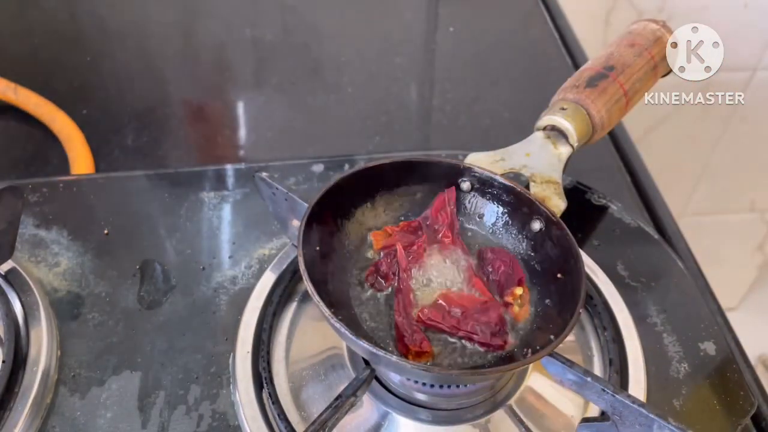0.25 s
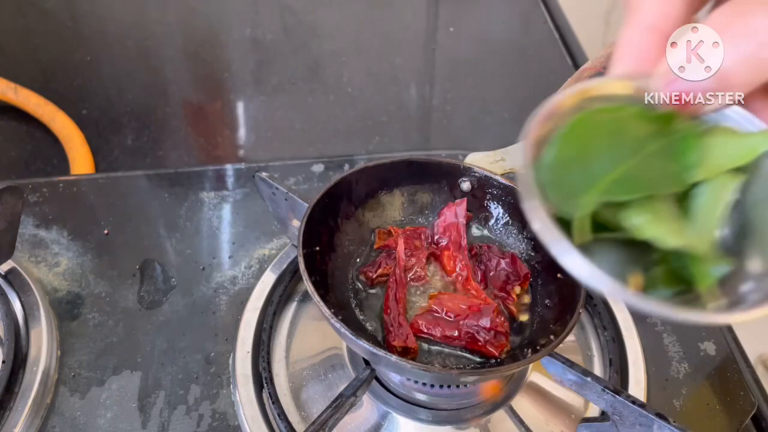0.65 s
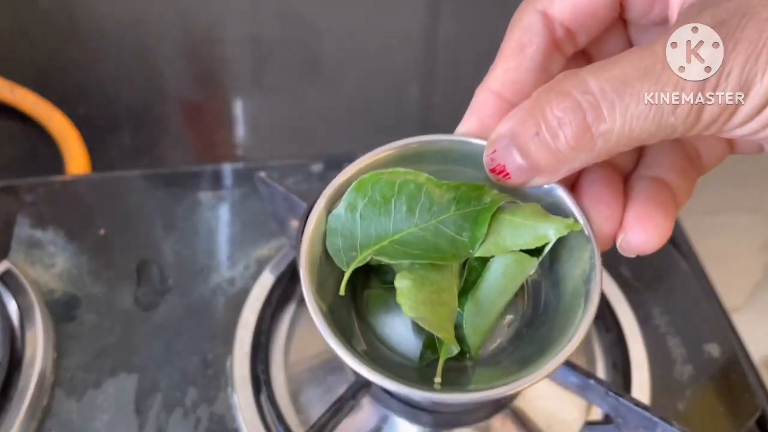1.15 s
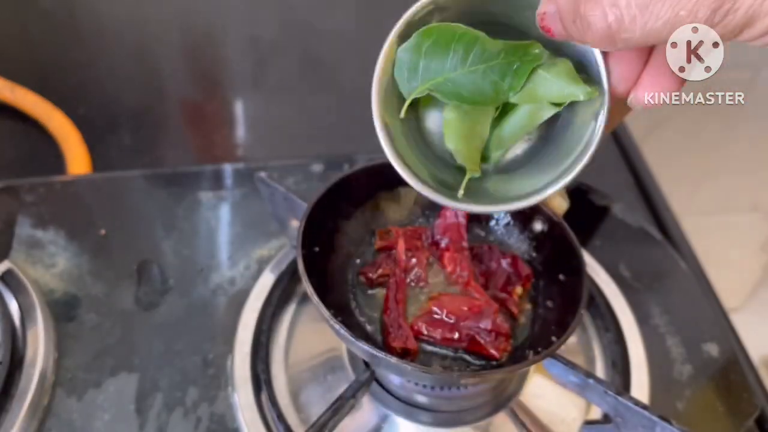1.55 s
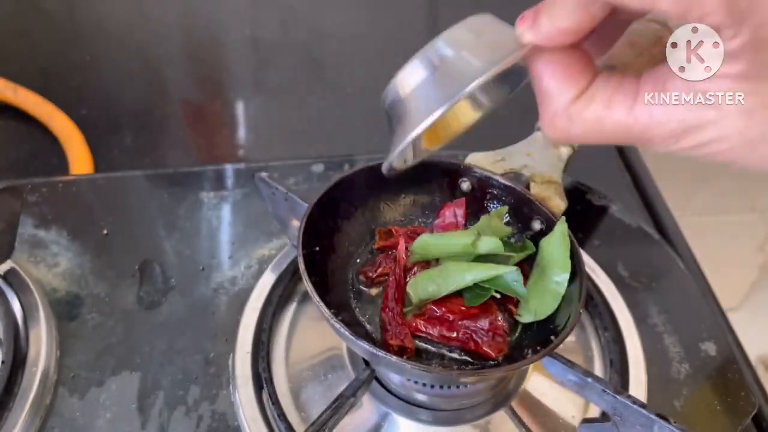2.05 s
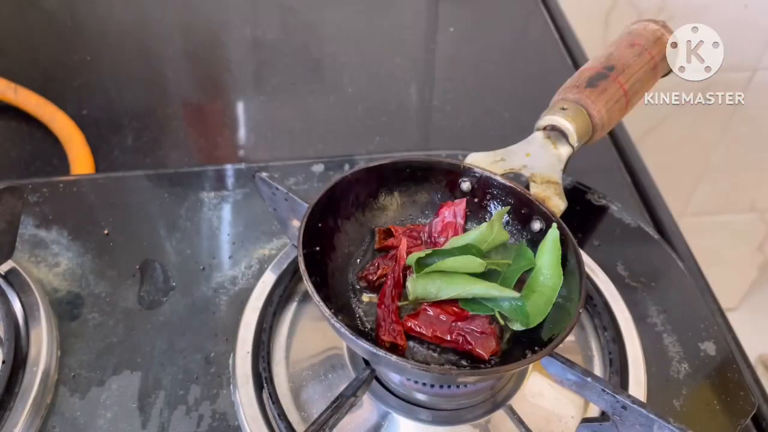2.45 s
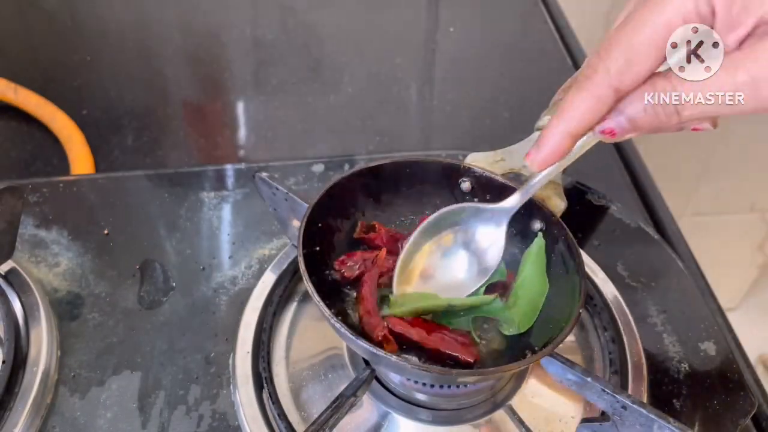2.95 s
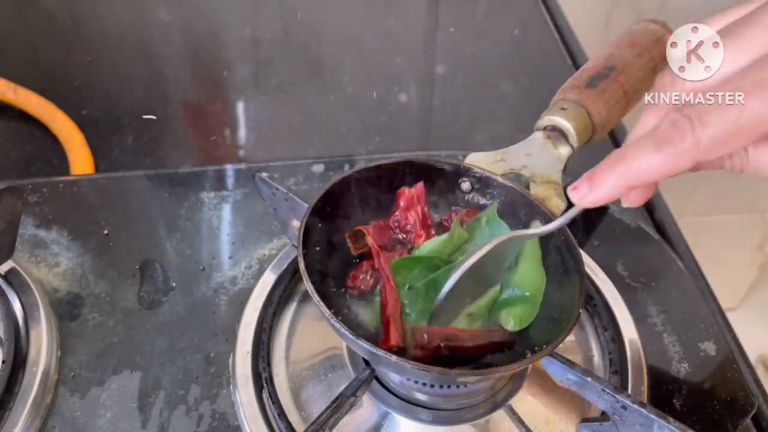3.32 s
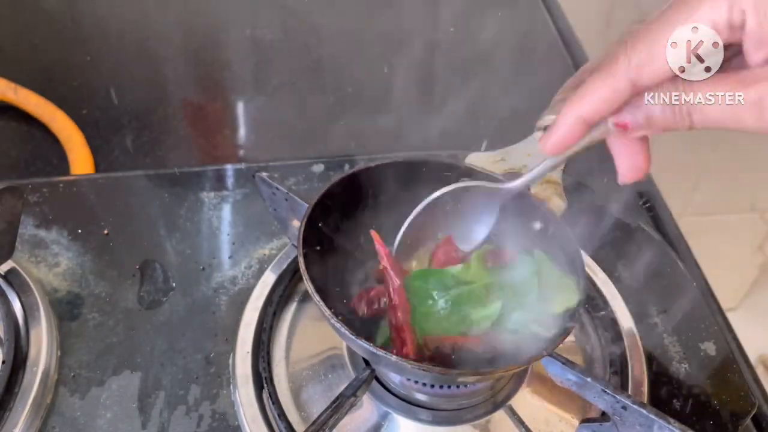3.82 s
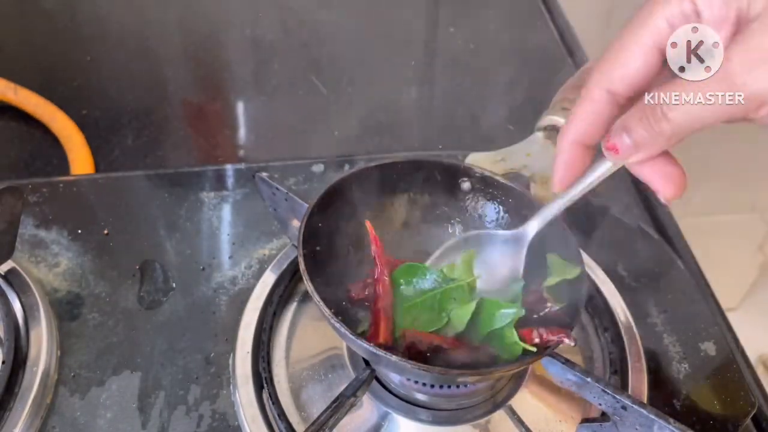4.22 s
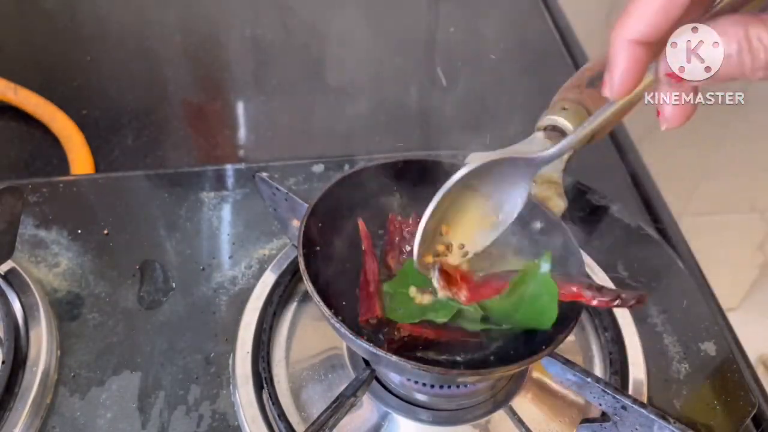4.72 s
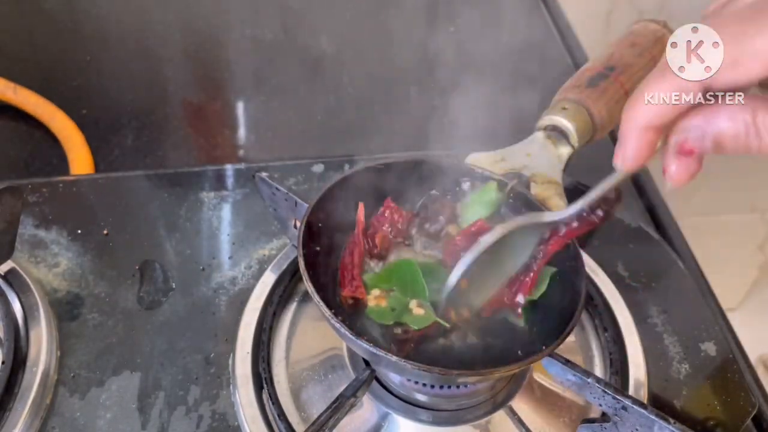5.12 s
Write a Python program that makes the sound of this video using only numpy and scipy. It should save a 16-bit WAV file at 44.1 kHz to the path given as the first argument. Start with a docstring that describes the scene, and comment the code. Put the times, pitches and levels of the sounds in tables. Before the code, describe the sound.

Hot oil crackles quietly with scattered sharp pops, then bursts into a loud sputtering sizzle when wet leaves are pressed in and stirred.

```python
"""Spices fry in a small iron pan over a gas flame: hiss and random clicks, coloured by the pan, that roar up
when wet leaves are pressed into the oil. Spits are short decaying rings with a bright snap and a low thud.
Under them the kitchen gives a low hum of uneven level and bands of noise; faint sine tones swell, and air puffs once.
A phone with two ports listens close by, a wall behind the stove; three takes are joined by two cuts, each a short
fade-out, a silent gap and a slower fade-in."""
import sys
import numpy as np
from scipy import signal
from scipy.fft import rfft, irfft, next_fast_len
from scipy.io import wavfile
from scipy.ndimage import uniform_filter1d

SR = 44100
rng = np.random.default_rng(int(sys.argv[2]) if len(sys.argv) > 2 else 0)


def waveform_to_disk(signal):
    """Save audio, clipped to [-1, 1], as 16-bit WAV at the path in sys.argv[1]."""
    frames = np.transpose(np.atleast_2d(signal))
    scaled = np.clip(frames, -1, 1) * 32767
    samples = np.round(scaled).astype(np.int16)
    wavfile.write(sys.argv[1], SR, samples)


N = 236808
SIZE = next_fast_len(N + SR // 2)  # room for the wash to ring out
HZ = np.maximum(np.arange(SIZE // 2 + 1) * SR / SIZE, 1)


def undb(db):
    """Decibels to amplitude."""
    return 10 ** (np.asarray(db) / 20)


def unit(x):
    """The same sound at an RMS level of 1."""
    return x / np.sqrt(np.mean(x ** 2))


def curves(rows):
    """Columns of (seconds, ..) rows as per-sample lines."""
    seconds, *columns = np.transpose(rows)
    return [np.interp(np.arange(N) / SR, seconds, column) for column in columns]


def over_hz(table):
    """A (Hz, value) table on the frequency axis, joined along log frequency."""
    hz, value = np.transpose(table)
    return np.interp(np.log(HZ), np.log(np.maximum(hz, 1)), value)


def shape(x, response):
    """Filter a sound by a frequency response."""
    return irfft(rfft(x, SIZE) * response, SIZE)[..., :N]


def walk(rate):
    """A random wander: normal draws, `rate` a second, held and smoothed twice; spread about 0.6."""
    hold = int(SR / rate)
    steps = np.repeat(rng.standard_normal(N // hold + 1), hold)
    return 0.82 * uniform_filter1d(uniform_filter1d(steps, hold), hold)[:N]


# Phase between the phone's two ports. Each row: frequency in Hz, lead of the left in radians.
PORT_LEAD = [(0, 0), (1120, -0.1), (1380, 0.9), (1980, 0.3), (3360, 0.9), (4480, 0.5), (4820, 1.3),
             (6800, -1.1), (7670, -3.0), (8870, -3.3), (10400, -6.0), (12900, -6.4), (13900, -9.4),
             (16300, -9.4)]
# Balance of the two ports. Each row: frequency in Hz, left minus right in dB.
PORT_BALANCE = [(60, 1.5), (110, 2.0), (200, 1.0), (380, 0.5), (700, 2.5), (1290, 1.5), (2380, 1.5),
                (4400, 3.0), (8120, 0.5), (15000, 0.0)]


def ports(same, other, likeness):
    """Left and right share one sound, up to the ports' phase and balance, plus a part that differs."""
    alike = over_hz(likeness)
    half = np.exp(.5j * over_hz(PORT_LEAD)) * undb(over_hz(PORT_BALANCE) / 2)
    common = rfft(same, SIZE) * np.sqrt((1 + alike) / 2)
    differing = rfft(other, SIZE) * np.sqrt((1 - alike) / 2)
    return irfft(np.array([(common + differing) * half, (common - differing) / half]), SIZE)[:, :N]


def crackles(per_s, spread_db):
    """Bursting bubbles: clicks at random, a few much larger than the rest."""
    burst, size, sign = rng.random((3, N))
    sizes = undb(-spread_db * np.log(np.maximum(size, .04)))
    return unit((burst < per_s / SR) * sizes * np.sign(sign - .5))


def scattered(x, ms):
    """The same sound after dense random bounces in the pan, dying by 1/e in `ms`."""
    t = np.arange(SR // 50) / SR
    bounces = rng.standard_normal(len(t)) * np.exp(-t * 1000 / ms)
    return signal.fftconvolve(x, bounces / np.linalg.norm(bounces))[:N]


# Patches of the sizzle. Centres of the overlapping bands in Hz.
PATCH_HZ = (1200, 2200, 3200, 4600, 6500)
# Body of the sizzle against its treble. Each row: time in seconds, gain of the low bands in dB.
BODY = [(0, -1), (2.9, 1), (3.1, -4), (3.17, -1.5), (3.25, 4), (3.41, 0), (3.47, 1), (3.53, -1),
        (3.65, 3.5), (3.85, 4), (3.95, 3.5), (4.3, -0.5), (4.45, -4.5), (4.56, 3.5), (4.66, -7),
        (4.8, -1.5), (4.95, -1), (5.1, 2.5), (5.2, 2.5), (5.37, 0)]
BODY_TOP_HZ = 3500  # bands centred below this follow the body
PATCH_DB, PATCH_PER_S = 2.5, 14  # dB for each unit of the wander, and its new draws a second


def patchy(x):
    """Bands of a sound, each surging by itself; the low ones also follow the body."""
    out, body_db = 0, curves(BODY)[0]
    for hz, row in zip(PATCH_HZ, np.eye(len(PATCH_HZ))):
        db = PATCH_DB * walk(PATCH_PER_S) + body_db * (hz < BODY_TOP_HZ)
        band = shape(x, over_hz(list(zip(PATCH_HZ, row))))
        out = out + band * undb(db)
    return out


# The oil in the pan. Each row: time in seconds, sizzle level in dB, level of the fine high spray in dB.
FRY = [(0, -47, -49), (.3, -48, -46), (.36, -44.5, -42), (.4, -40.5, -40), (.45, -44.5, -38),
       (.5, -45, -46.5), (.7, -53, -60), (1.3, -54, -66), (2.05, -55.5, -57.5), (2.3, -51.5, -48.5),
       (2.56, -44, -54), (2.62, -48, -52), (2.72, -60, -55), (2.88, -52, -59), (2.95, -36.5, -36.5),
       (3.05, -30.5, -32), (3.14, -22, -23), (3.17, -28, -26), (3.21, -28.5, -27.5), (3.3, -22.5, -23.5),
       (3.36, -24.5, -25), (3.4, -20, -25.5), (3.435, -19.5, -22), (3.445, -24.5, -26), (3.48, -23, -20),
       (3.53, -22, -25), (3.62, -30, -32.5), (3.7, -29, -29), (3.8, -27, -25), (3.87, -31, -31.5),
       (3.93, -30.5, -31), (3.97, -32.5, -31), (4.1, -32, -32), (4.2, -31.5, -34.5), (4.3, -32, -35.5),
       (4.38, -31, -32), (4.43, -28.5, -32), (4.48, -31.5, -33.5), (4.55, -33, -31.5), (4.66, -28, -34),
       (4.78, -28.5, -33.5), (4.9, -32, -34), (4.96, -28.5, -30.5), (5.0, -33.5, -29.5), (5.06, -34, -29),
       (5.14, -33, -30), (5.22, -34.5, -29.5), (5.28, -32.5, -35), (5.33, -33, -33.5), (5.37, -32, -36)]
# Colour of the sizzle. Each row: frequency in Hz, relative level in dB.
SIZZLE_COLOUR = [(150, -36), (400, -18.5), (1000, -6.5), (1330, -13), (1560, 1), (2100, -2.5), (2300, 2),
                 (2700, -4.5), (3100, 3), (3800, -0.5), (4100, -3), (7000, 2), (9000, -1), (12000, -46.5)]
# Colour of the fine spray. Each row: frequency in Hz, relative level in dB.
SPRAY_COLOUR = [(5000, -30), (7500, -2), (9000, 0), (11000, -3), (13200, -9), (15500, -4), (16000, -6)]
# Lone crackles carry more when the oil is quiet. Each row: sizzle level in dB, share of power from 0 to 1.
CRACKLE_SHARE = [(-51, 0.45), (-38.5, 0.44), (-22.5, .2)]
FLURRY_MS = 3.9  # 1/e fade of a flurry's power
# fizz after a spit: sizzle against the spit, spray against its bright edge, 1/e fade of the power
AFTERFIZZ_DB, AFTERFIZZ_SPRAY_DB, AFTERFIZZ_MS = -26, -10.5, 4.8


def fading(x, ms):
    """Let each impulse die away by 1/e in `ms`."""
    return signal.lfilter([1], [1, -np.exp(-1000 / (ms * SR))], x)


def frying():
    """Dense hiss of tiny bubbles and lone crackles, coloured by the pan; a second row for what differs at the ports."""
    db, spray_db = curves(FRY)
    share = np.interp(db, *np.transpose(CRACKLE_SHARE))
    # each spit in the table leaves the oil fizzing
    after = np.zeros((2, N))
    for s, spit_db, _, edge_db in SPITS:
        after[:, int(s * SR)] = undb([spit_db + AFTERFIZZ_DB, spit_db + edge_db + AFTERFIZZ_SPRAY_DB])
    after = fading(after ** 2, AFTERFIZZ_MS)
    burst = crackles(1200, spread_db=6.0)
    # sparse random bursts each swell hiss and crackles alike: a brief flurry
    flurry = fading(crackles(170, spread_db=3.5) ** 2, FLURRY_MS)
    surge = unit(np.sqrt(1 + 0.23 * flurry / np.mean(flurry)) * undb(0.63 * walk(40)))
    burst = surge * np.array([burst, scattered(burst, ms=0.64)])
    out = 0
    for colour, gain_db, fizz in zip((SIZZLE_COLOUR, SPRAY_COLOUR), (db, spray_db), after):
        hiss = surge * rng.standard_normal((2, N))
        drive = np.sqrt(1 - share) * hiss + np.sqrt(share) * burst
        coloured = unit(patchy(shape(drive, undb(over_hz(colour)))))
        out = out + np.sqrt(undb(gain_db) ** 2 + fizz) * coloured
    return out


# Low hum. Each row: time in seconds, level in dB.
HUM = [(0, -31), (.07, -31), (.19, -29.5), (.24, -44), (.48, -37.5), (.66, -29), (.7, -32.5), (.76, -46.5),
       (.9, -22.5), (.94, -30), (1.0, -40.5), (1.1, -33), (1.17, -36), (1.25, -25.5), (1.3, -47),
       (1.49, -36), (1.54, -33.5), (1.62, -34), (1.75, -28.5), (1.82, -42), (1.93, -31.5), (1.97, -39),
       (2.06, -25), (2.17, -29.5), (2.33, -38.5), (2.5, -34), (2.59, -59), (2.71, -41), (2.75, -58),
       (2.83, -42), (2.89, -46), (2.97, -38), (3.05, -53), (3.3, -38.5), (3.36, -62), (3.6, -49),
       (3.75, -50), (4.28, -66), (4.71, -59), (5.08, -50), (5.37, -55)]
# Kitchen around the stove. Each row: time in seconds, rumble level in dB, mid-band hush level in dB.
KITCHEN = [(0, -34, -36), (.45, -33, -36.5), (.75, -31.5, -38), (.9, -35.5, -40), (1.04, -33.5, -38),
           (1.4, -34, -38.5), (1.7, -35, -38.5), (2.0, -34.5, -36.5), (2.33, -35, -38.5),
           (2.56, -40, -40.5), (2.96, -37, -41), (3.4, -39, -44), (3.6, -48, -51.5), (4.2, -59.5, -46),
           (4.5, -50, -57), (4.7, -47, -49), (5.37, -44, -51)]
# Drone. Each row: time in seconds, level in dB.
DRONE = [(0, -42), (2.3, -43), (2.5, -48.5), (3.4, -45.5), (3.6, -55), (4.55, -59.5), (4.68, -46.5),
         (5.37, -51.5)]
# Colours of rumble, drone and hush. Each row: frequency in Hz, relative level in dB.
RUMBLE_COLOUR = [(30, -38), (50, -11), (70, -0.5), (81, 6), (95, 1.5), (115, 1), (135, -1), (170, -16),
                 (300, -13), (450, -49)]
DRONE_COLOUR = [(150, -28.5), (185, -10), (200, 2.5), (220, -13.5), (245, 0.5), (270, -28), (330, -46)]
HUSH_COLOUR = [(150, -0.5), (300, -4), (500, -2.5), (1100, -7), (2200, -14.5), (4000, -23.5), (7000, -35),
               (12000, -64)]
# The kitchen at the two ports. Each row: frequency in Hz, likeness from 0 to 1.
FAR_LIKENESS = [(60, 0.94), (180, 0.89), (330, 0.6), (450, 0.017), (2000, 0.05), (4000, 0.91)]
HUM_HZ, HUM_WAVER_HZ = 59.5, 3.3  # pitch, and its shift for each unit of the wander


def kitchen():
    """Flame and house: a low sine hum that wanders in pitch and level; wavering noise bands for rumble, drone, hush."""
    hum = np.sqrt(2) * np.sin(2 * np.pi * np.cumsum(HUM_HZ + HUM_WAVER_HZ * walk(13)) / SR)
    out = undb(curves(HUM)[0]) * np.array([hum, hum])
    rumble_db, hush_db = curves(KITCHEN)
    levels_db = rumble_db, curves(DRONE)[0], hush_db
    colours = RUMBLE_COLOUR, DRONE_COLOUR, HUSH_COLOUR
    for colour, db, waver_db in zip(colours, levels_db, (2.0, 3.5, 2.2)):
        pair = shape(rng.standard_normal((2, N)), undb(over_hz(colour)))
        out = out + undb(db + waver_db * walk(12)) * unit(pair)
    return ports(*out, FAR_LIKENESS)


# Faint tones near the pan. Each row: start in seconds, end in seconds, level in dB, pitch in Hz.
TONES = [(-.04, 0.115, -45.5, 877), (0.153, 0.262, -47, 534), (.3, 0.442, -44, 517),
         (1.198, 1.415, -50.5, 2620), (1.917, 2.055, -53, 1600), (1.93, 2.03, -50, 800),
         (2.027, 2.17, -50, 756)]
# for each unit of the wander: relative pitch shift and level change; then the ramp at either end
TONE_WAVER, TONE_FLUTTER_DB, TONE_SWELL_S = .004, 3, .03


def whistle():
    """Faint, slightly wavering sine tones that swell and fade."""
    t, out = np.arange(N) / SR, 0
    for start, end, db, hz in TONES:
        ramp = np.clip(np.minimum(t - start, end - t) / TONE_SWELL_S, 0, 1)
        swell = ramp * undb(db + TONE_FLUTTER_DB * walk(40.36))
        phase = 2 * np.pi * np.cumsum(hz * (1 + TONE_WAVER * walk(40))) / SR
        out = out + swell * np.sqrt(2) * np.sin(phase)
    return out


# small spits: rate, level over the sizzle and its scatter, pitch range, bright edge
SMALL_PER_S, SMALL_DB, SMALL_SCATTER_DB, SMALL_HZ, SMALL_EDGE_DB = 240, 5, 1.7, (2100, 7000), -13


def small_spits():
    """Rows like the table of spits, drawn at random, their level following the sizzle."""
    when, size, pitch = rng.random((int(SMALL_PER_S * N / SR), 3)).T
    sizzle_db = curves(FRY)[0][(when * N).astype(int)]
    db = sizzle_db + SMALL_DB - SMALL_SCATTER_DB * np.log(np.maximum(size, .05))
    low, high = SMALL_HZ
    pitches = low * (high / low) ** pitch
    return [(s, d, hz, SMALL_EDGE_DB) for s, d, hz in zip(when * N / SR, db, pitches)]


# Spits from the pan, before its colour.
# Each row: time in seconds, level in dB, pitch in Hz, bright edge against that level in dB.
SPITS = [(0.0166, -17.5, 2260, -18), (0.1213, -22.5, 6900, -22), (.1374, -35, 5000, -10),
         (.213, -37, 2320, -3), (0.224, -28, 5060, -0.5), (0.237, -20, 6950, -18), (0.3755, -12, 3410, -9),
         (.3545, -30, 4000, -8), (0.392, -30, 3300, -4), (0.399, -30, 3300, 0), (0.418, -27, 4250, 8),
         (0.4247, -18, 5900, -23), (0.4846, -24, 5030, -2.5), (.776, -22, 6140, -25),
         (0.7865, -21, 2280, 4), (0.8037, -19.5, 2670, -21), (.811, -19, 6940, -7),
         (1.095, -28.5, 2270, -23), (1.228, -26, 5040, -27), (1.3911, -15.5, 2330, -20),
         (1.5728, -8.5, 2800, -25), (1.766, -39, 2080, -20), (1.94, -29.5, 3220, -9),
         (2.1164, -34.5, 2260, 3), (2.1658, -39, 2230, 1), (2.1881, -33, 2470, 2), (2.203, -35, 2030, 3.5),
         (2.339, -23, 6340, -13), (2.4277, -8.5, 2780, -26), (2.512, -7.5, 3010, -15),
         (2.521, -11.5, 2560, -14), (2.5385, -17, 3140, -9), (2.554, -18, 2470, -11),
         (2.604, -30.5, 6800, 0), (2.678, -38, 6500, 2), (2.7015, -34.5, 5500, 7),
         (2.7207, -29.5, 3650, -12), (2.809, -21, 2650, -17), (2.8156, -19, 2210, -26),
         (2.8728, -28, 6450, -5), (2.9016, -20, 5100, -20), (2.918, -7.5, 3620, -17),
         (2.9417, -17.5, 2540, -5), (2.974, -15.5, 6400, -17), (2.988, -16.5, 3000, -12),
         (2.996, -19.5, 5200, -5), (3.0435, -23, 2410, 1.5), (3.0537, -18, 2380, -12),
         (3.088, -10, 3720, -3), (3.114, -13, 3330, -7), (3.125, -16, 4030, -15), (3.1367, -24, 3030, -14),
         (3.146, -16.5, 3030, 4), (3.183, -12.5, 3040, -6), (3.2034, -15, 2930, -12),
         (3.2124, -8, 2230, -7), (3.2879, -10, 2310, -15), (3.3256, -8.5, 2850, -13),
         (3.3576, -11, 2400, -15), (3.388, -14, 4030, -10), (3.443, -12, 3180, 2), (3.638, -17, 3500, -8),
         (3.661, -17, 3400, -8), (3.692, -16, 3400, -9), (3.7054, -15, 5300, -15),
         (3.7702, -12.5, 2280, -14), (3.778, -19, 3000, -12), (3.79, -17, 4870, -12),
         (3.798, -19, 3000, -12), (3.809, -23, 3540, -11), (3.832, -13, 2240, -20),
         (3.8505, -11.5, 2260, -12), (3.9363, -15.5, 2100, -11), (4.2666, -17.5, 2370, -9),
         (4.2782, -21, 2280, -12), (4.4993, -16, 2520, -14), (4.5202, -10, 2980, -9),
         (4.5353, -7.5, 3070, -10.5), (4.5517, -16, 3500, -14), (4.563, -9, 3100, -8.5),
         (4.571, -19, 3000, -13), (4.644, -16, 3540, -4), (4.68, -25, 2200, -12), (4.705, -13.5, 3440, -22),
         (4.7203, -19, 2450, -21), (4.768, -18, 2320, -20), (4.7728, -12.5, 2420, -3),
         (4.7874, -9, 2680, -8), (4.8225, -16, 2800, -16), (4.8567, -11.5, 2590, -5),
         (4.8776, -12, 2710, -12), (4.9014, -15, 3060, -17), (4.923, -17, 2310, -3), (4.968, -21, 3000, -7),
         (5.026, -17, 2320, -6), (5.0315, -11.5, 2460, 0.5), (5.0337, -23, 6500, 0), (5.111, -12, 4500, -6),
         (5.133, -28.5, 3000, 9), (5.1752, -5.5, 2630, -33), (5.1917, -9.5, 3080, -9.5),
         (5.2029, -31, 3000, -8), (5.22, -20, 2220, 5), (5.244, -20, 2180, -5), (5.2928, -20.5, 2530, 0),
         (5.3422, -16, 6440, -23), (5.353, -19, 2420, -19)]
LINGER_DB, LINGER_MS = -19, 7  # faint sputter around the pitch, its 1/e fade
TICK_DB, TICK_MS, TICK_TOP_HZ = -8, .25, 7000  # broad opening tick: level, centre, upper edge
THUD_DB = -13  # low thud, under the spit's level
EARLY_MS, EARLY_DB = (.35, .9), -14  # a weak snap: least and most lead on the strong one, level against it


def spits():
    """Each drop of water bursts: a cycle or two at its pitch that rings out, a bright snap that fizzes out, a low thud."""
    out, t, rows = np.zeros(N + 2048), np.arange(1024) / SR, SPITS + small_spits()
    treble = signal.butter(2, 4500, "high", fs=SR, output="sos")
    fizz = signal.sosfilt(treble, rng.standard_normal((len(rows), 1024)))
    grains = unit(uniform_filter1d(rng.standard_normal((len(rows), 1024)), size=40))
    leads_ms = rng.uniform(*EARLY_MS, len(rows))
    for (s, db, hz, edge_db), hiss, grain, early_ms in zip(rows, fizz, grains, leads_ms):
        rise = t * hz / 0.5  # half a cycle to the envelope's peak
        linger = undb(LINGER_DB) * np.minimum(rise, 1) * np.exp(-t * 1000 / LINGER_MS)
        linger = linger * grain * np.cos(t / t[-1] * np.pi / 2)  # closes to silence
        ring = (rise * np.exp(1 - rise) + linger) * np.sin(2 * np.pi * hz * t)
        edge = undb(edge_db) * hiss * (2.8 * np.exp(-t / 0.00023) + .5 * np.exp(-t / 0.0003))
        tick = np.sinc((t - TICK_MS / 1000) * 2 * TICK_TOP_HZ) * (t < 2 * TICK_MS / 1000)
        edge = edge - undb(TICK_DB) * tick
        thud = undb(THUD_DB) * np.exp(-t / 0.00015)
        for at, gain_db in ((s, db), (s - early_ms / 1000, db + EARLY_DB)):
            i = max(int(at * SR), 0)
            out[i:i + 1024] += undb(gain_db) * (ring + edge + thud)
    return out[:N]


TAIL_T60_S = 0.19  # time to fall 60 dB


def tail(x, db):
    """Tiles and pan give back a short wash of decaying noise, other in each ear, duller above 5 kHz."""
    t = np.arange(SR // 2) / SR
    wash = rng.standard_normal((2, len(t))) * 1000 ** (-t / TAIL_T60_S) * np.minimum(t / 0.0011, 1)
    dull = np.minimum(5000 / HZ, 1) ** 3
    return undb(db) * shape(x, rfft(wash / np.linalg.norm(wash[0]), SIZE) * dull)


# Cuts between three joined takes. Each row: end of one take in seconds, start of the next in seconds.
CUTS = [(0.495, 0.56), (2.356, 2.4205)]
FADE_OUT_S, FADE_OUT_DB, FADE_IN_S, FADE_IN_BEND = 0.062, -10, 0.17, 1.48  # bend: power of the ramp


def cuts():
    """Gain over the joins: a short fade-out, a silent gap, a slower fade-in."""
    t, gain = np.arange(N) / SR, 1
    for end, start in CUTS:
        going = (t < end) * undb(FADE_OUT_DB * np.clip(1 - (end - t) / FADE_OUT_S, 0, 1))
        coming = np.clip((t - start) / FADE_IN_S, 0, 1) ** FADE_IN_BEND
        gain = gain * (going + coming)
    return gain


# A puff of air on the phone, ahead of its filters. One row: time in seconds, peak in dB, corner frequency in Hz.
PUFF = (3.4858, 2.5, 254)
# The air settles after it. One row: pitch in Hz, starting level in dB, time to fall 60 dB in seconds.
PUFF_RING = (51, -25, 0.74)


def puff():
    """One short suck of air, a negative pulse, and a deep decaying wobble after it."""
    s, db, top_hz = PUFF
    ring_hz, ring_db, t60 = PUFF_RING
    t = np.maximum(np.arange(N) / SR - s, 0)
    ring = undb(ring_db) * 1000 ** (-t / t60) * np.sin(2 * np.pi * ring_hz * t)
    rise = 2 * np.pi * top_hz * t
    return ring - undb(db) * rise * np.exp(1 - rise)


# The pan's colour on a spit. Each row: frequency in Hz, gain in dB.
PAN_COLOUR = [(300, 2), (900, 2.5), (1350, -5), (1700, -1.5), (3600, -2), (4200, -3.5), (5000, 2.5),
              (5600, -0.5), (6400, -0.5), (7500, 1.5), (12000, -3.5)]
# Near sounds at the two ports. Each row: frequency in Hz, likeness from 0 to 1.
NEAR_LIKENESS = [(100, .97), (500, .65), (1000, .85), (2500, .92), (5000, .72), (7000, .8), (7700, .995),
                 (8900, .995), (9600, .75), (10600, .99), (12800, .99), (13400, .6), (14000, .995)]
WALL_MS, WALL_DB = 9.9, -14  # the wall's echo: delay, level
SPIT_TAIL_DB, FRY_TAIL_DB = -5, -31  # wash against its source, before it is dulled


def scene():
    """The pan close to the phone, with its wall echo and wash, over the kitchen."""
    # the wall behind the stove returns the frying and the spits once, without their top
    wall = 1 + undb(WALL_DB) * np.exp(-2j * np.pi * HZ * WALL_MS / 1000) / (1 + (HZ / 6000) ** 4)
    fry = shape(frying(), wall) + whistle()
    spit = shape(spits(), wall * undb(over_hz(PAN_COLOUR)))
    direct = ports(spit + puff(), 0 * spit, [(100, 1), (1000, 1)])  # fully alike at both ports
    washes = tail(spit, SPIT_TAIL_DB) + tail(fry[0], FRY_TAIL_DB)
    return ports(*fry, NEAR_LIKENESS) + direct + washes + kitchen()


TOP_HZ = 16000  # almost nothing is left above this


def record(dry, turns=1.11, low_hz=3.2, high_hz=4000):
    """The phone's filters let the lows come late, so a push turns into a falling chirp; then the cuts and band limits."""
    late = np.exp(-2j * np.pi * turns * np.log((1 + HZ / low_hz) / (1 + HZ / high_hz)))
    no_subs = 1 / (1 + (36 / HZ) ** 4)
    wet = shape(dry, late * no_subs) * cuts()
    wet = signal.sosfilt(signal.butter(2, 20, "high", fs=SR, output="sos"), wet)
    return signal.sosfilt(signal.ellip(12, .2, 100, TOP_HZ, fs=SR, output="sos"), wet)


dry = scene()
out = record(dry)
waveform_to_disk(out)
```